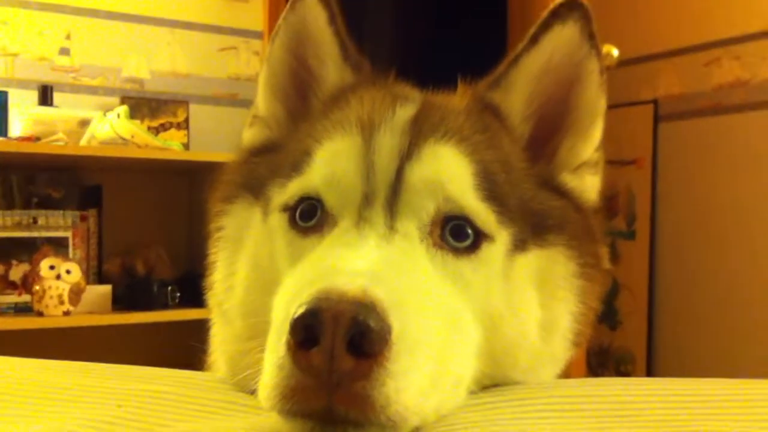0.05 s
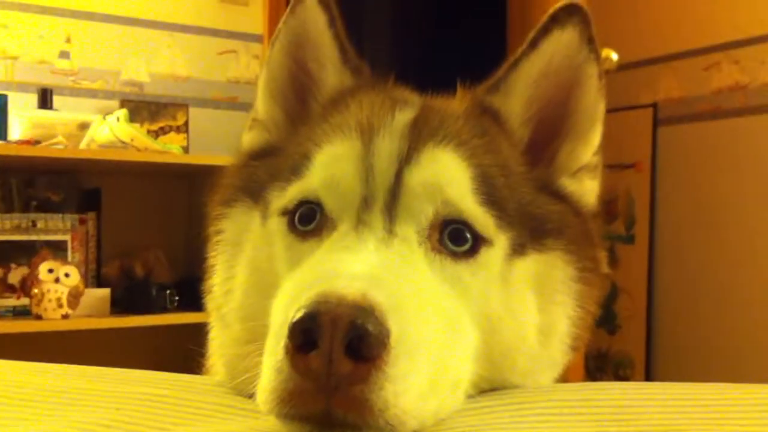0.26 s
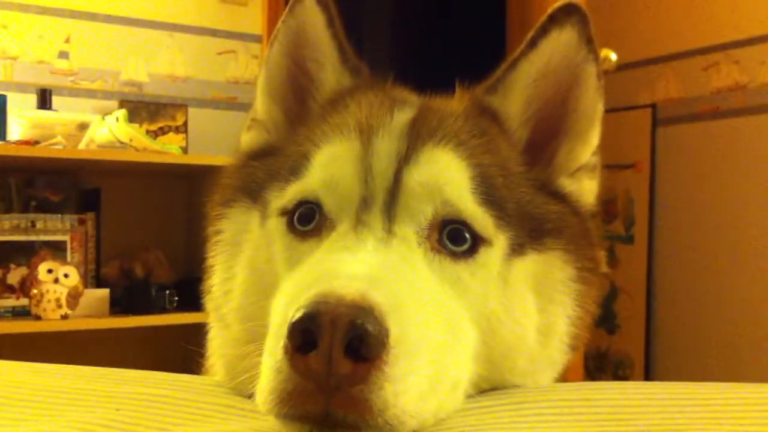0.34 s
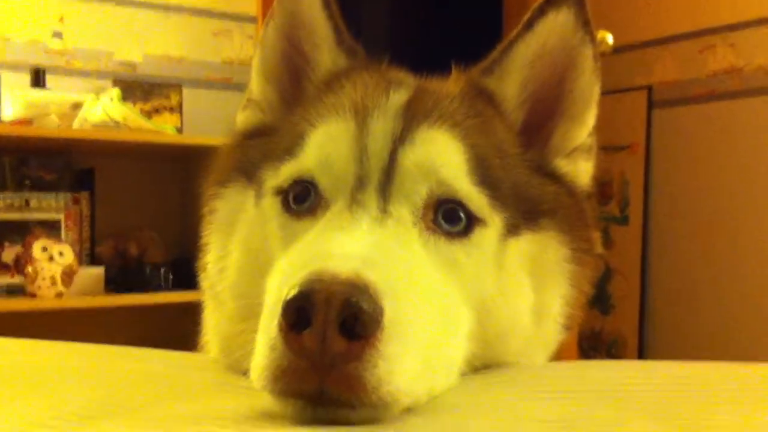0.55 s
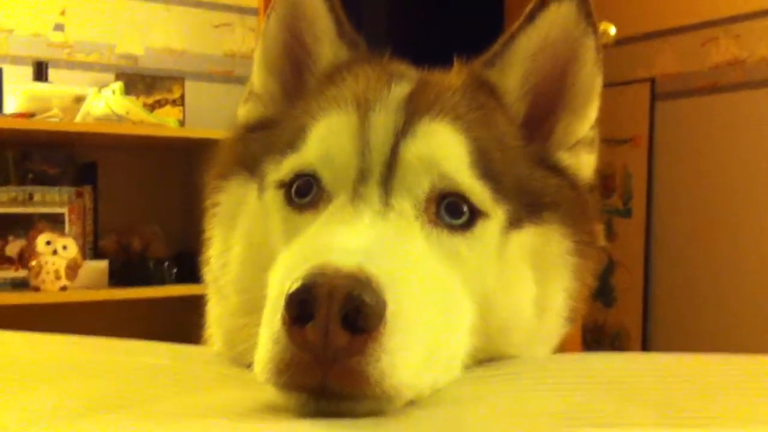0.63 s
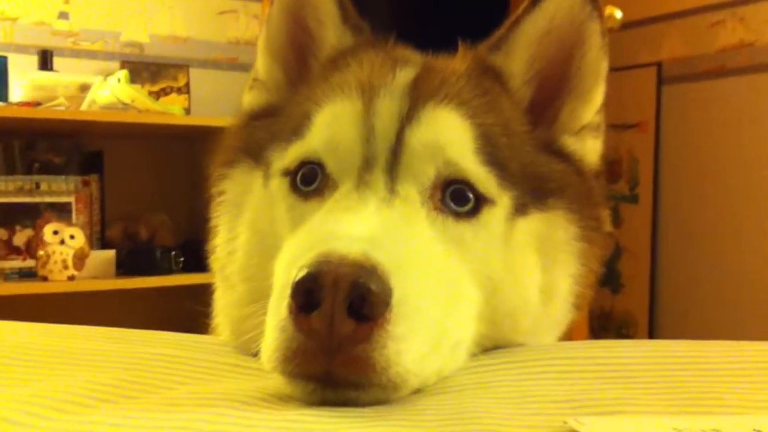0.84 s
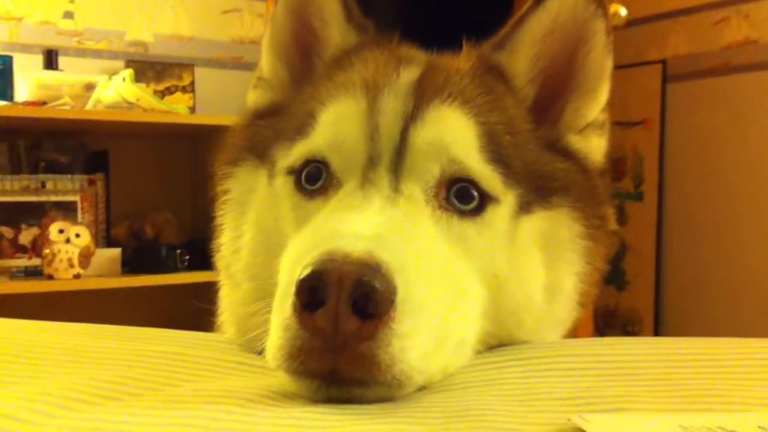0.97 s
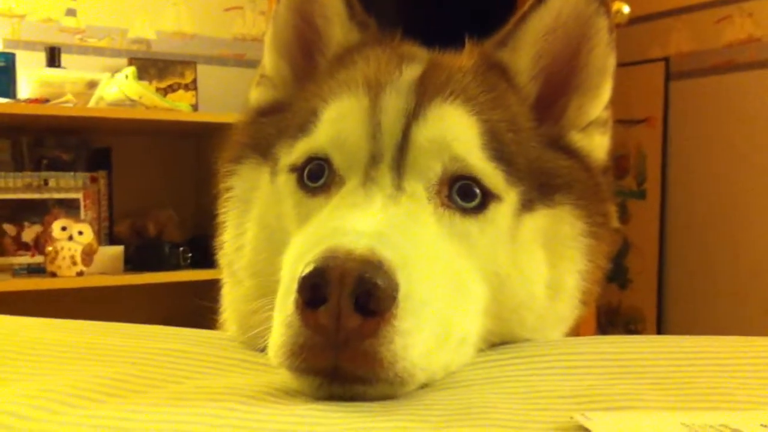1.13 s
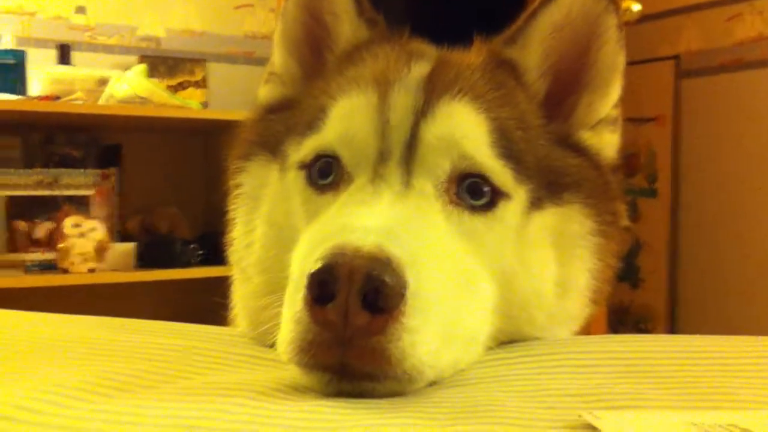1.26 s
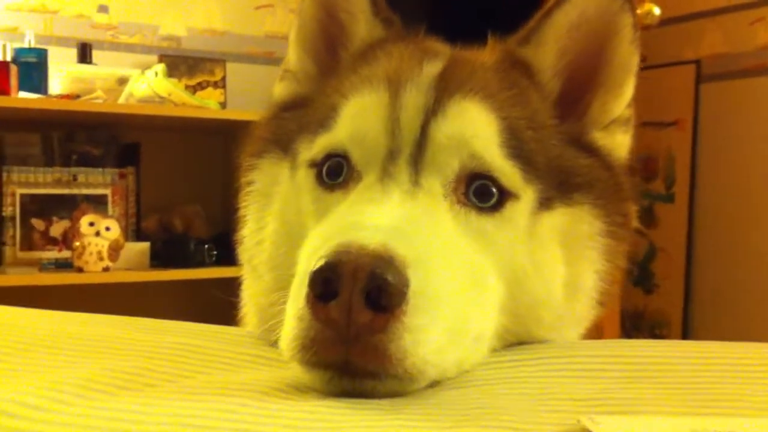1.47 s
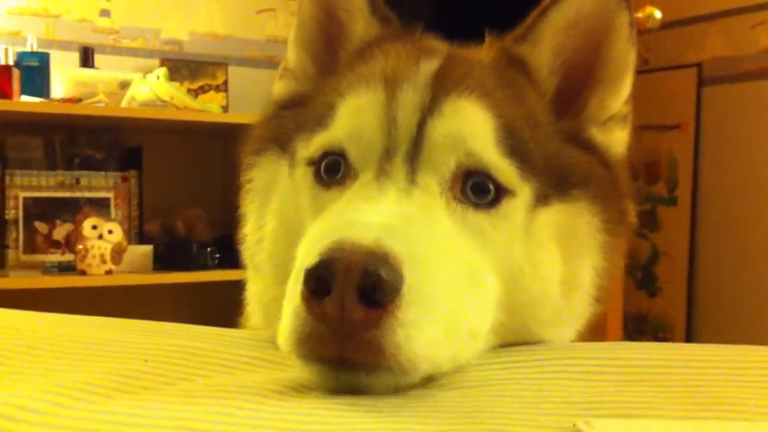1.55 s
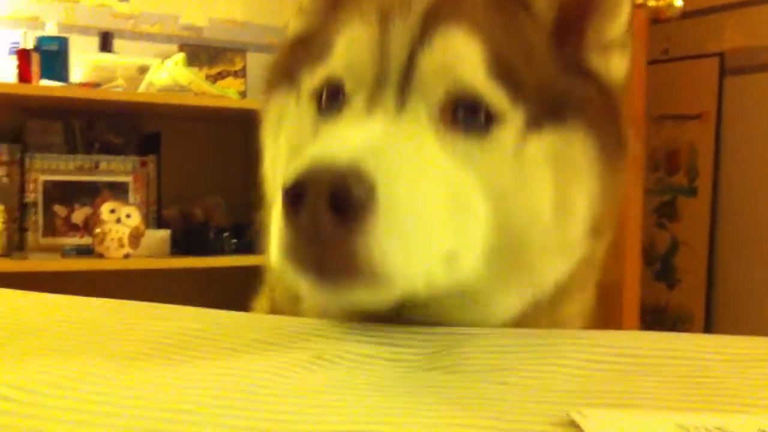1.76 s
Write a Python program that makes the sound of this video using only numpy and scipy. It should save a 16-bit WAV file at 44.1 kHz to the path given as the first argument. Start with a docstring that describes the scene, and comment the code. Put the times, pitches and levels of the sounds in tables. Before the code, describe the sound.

A dish clinks sharply at about 0.1 seconds, ringing briefly in a small quiet room. A much lighter tap on it follows at 0.5 seconds. From 1.2 seconds to about 1.8, a dog shifts its chin on bedding close by: fur rustles faintly and the cloth gives several dull ticks, with a very soft thud at 1.3 seconds. Faint room hiss lies underneath.

```python
"""Dish knocks and a dog on its bedding

A dish is knocked twice in a small quiet room: a sharp clink, then a light tap at another spot.
Each knock cracks, rings briefly in the dish and dies away in the room, with faint hums close by.
Then a dog shifts its chin on the bedding: fur rustles on cloth, folds give way with dull ticks
and the mattress thuds softly. Faint room noise and hiss lie under it all."""
import sys
import numpy as np
from scipy import signal
from scipy.fft import rfft, irfft
from scipy.io import wavfile
from scipy.ndimage import uniform_filter1d

SR = 44100
rng = np.random.default_rng(int(sys.argv[2]) if len(sys.argv) > 2 else 0)


def int16_out(signal):
    """Quantize to a 16-bit WAV file."""
    q = np.round(np.clip(np.atleast_2d(signal).T, -1, 1) * 32767)
    wavfile.write(sys.argv[1], SR, q.astype(np.int16))


N = 79380
TIME = np.arange(N) / SR


def from_db(db):
    """Turn decibels into a factor to multiply a sound by."""
    return 10 ** (np.asarray(db) / 20)


def at_hz(points, hz):
    """Read between the rows of a frequency table, giving each octave equal space."""
    freqs, values = np.transpose(points)
    return np.interp(np.log(np.maximum(hz, 1)), np.log(freqs), values)


def coloured(x, spectrum):
    """Filter x to the given spectrum with no ringing ahead of a hit; white noise keeps its power."""
    gain = from_db(at_hz(spectrum, np.fft.rfftfreq(N, 1 / SR)))
    gain /= np.sqrt(np.mean(gain ** 2))
    cepstrum = irfft(np.log(gain), N)
    fold = (1 + np.sign(np.arange(N))) * (np.arange(N) < N // 2)   # makes the filter minimum-phase
    return irfft(rfft(x) * np.exp(rfft(cepstrum * fold)), N)


def wobble(size):
    """A random drift with a spread of 1, smoothed over `size` samples."""
    drift = uniform_filter1d(rng.standard_normal(N), size=size)
    return drift / drift.std()


def decay(start, t60):
    """A sudden start, then a fade that loses 60 dB every t60 seconds."""
    return (TIME >= start) * from_db(-60 * np.maximum(TIME - start, 0) / t60)


def ring(start, hz, t60):
    """One fading tone of a struck object."""
    return decay(start, t60) * np.sin(2 * np.pi * hz * (TIME - start))


def swell(peak_s, width_s, hz, db):
    """A short, slightly unsteady tone that fades in and out."""
    pitch = hz * (1 + 0.019 * wobble(size=300))
    phase = 2 * np.pi * np.cumsum(pitch) / SR
    return from_db(db) * np.exp(-((TIME - peak_s) / width_s) ** 2) * np.sin(phase)


def background():
    """Faint, steady room noise and hiss."""
    # tone colour of the noise: f/Hz, level/dB per Hz
    spectrum = [(25, 8.5), (50, -28), (80, -5), (125, 9), (240, 4.5), (450, 3), (800, -0.5), (2000, -3),
                (5000, -5), (10000, -8), (16000, -9)]
    return from_db(-68) * coloured(rng.standard_normal(N), spectrum)


def fur_rustle():
    """Fur rubs on cloth with a grainy noise: a trace at first, more when the dog shifts its chin."""
    # loudness of the rubbing: t/s, level/dB
    rubbing = [(0, -65.5), (.08, -74.5), (.3, -72.5), (1.05, -81), (1.2, -67.5), (1.28, -63.5),
               (1.37, -63.5), (1.43, -62.5), (1.54, -62), (1.64, -65.5), (1.72, -63.5), (1.8, -63)]
    # tone colour of the cloth: f/Hz, level/dB per Hz
    cloth = [(50, -20.5), (130, -3), (250, 3), (550, -3), (1000, -9), (2000, -15.5), (5000, -21),
             (10000, -21), (16000, -25.5)]
    level_db = np.interp(TIME, *np.transpose(rubbing))
    grain_db = 1.5 * wobble(size=200)
    return from_db(level_db + grain_db) * coloured(rng.standard_normal(N), cloth)


def dish_knocks():
    """Each knock snaps, cracks and sets the dish ringing; where it lands sets the mix of tones."""
    # the knocks: t/s, ring level/dB, crack level/dB, crack fade time/s, place (0 = rim, 1 = foot)
    knocks = [(0.132, -29, -25, 0.073, 0.011), (0.4913, -47.5, -43, 0.038, 0.94)]
    # the dish's own tones: f/Hz, fade time/s, level struck at the rim/dB, level struck at the foot/dB
    tones = [(532.4, 0.062, -4, -22), (675, 0.055, -15, -0.5), (765, 0.048, -66, 2.5),
             (1016, 0.073, -12, -18), (1250, 0.042, -20, -6), (1328, 0.049, -6, 6.5),
             (1864, 0.037, -1, -12), (1958, .06, -4.5, -26), (2373, 0.08, -4.5, -4.5),
             (2606, 0.052, -1, -29), (2660, 0.043, 0, -2), (2995, 0.041, 8, -9.5), (3060, 0.14, -0.5, -22),
             (3073, .08, 0, -3), (3587, 0.22, -18.5, -10), (3820, 0.064, -11.5, -1.5),
             (4190, 0.046, 0, -0.5), (4323, .06, -2.5, -1.5), (5535, .05, -2, -10), (5686, .08, -6.5, -16),
             (6160, 0.045, -7, -2), (6330, 0.065, -9, -9), (7050, 0.047, -0.5, -31),
             (7444, 0.045, -2.5, -2), (7700, 0.037, -10, 2), (8280, 0.076, -5.5, -14.5),
             (9233, 0.042, 3, -28), (10440, 0.092, -14.5, -14), (11770, 0.047, -1, -5),
             (12480, .045, -2.5, -27), (13600, .045, -10, -23)]
    # the crowd of short-lived overtones in the crack: f/Hz, level/dB per Hz
    crack = [(30, -7), (80, -17.5), (200, -8), (320, -3.5), (600, -3.5), (840, -17), (1150, 3),
             (1600, -6.5), (2600, 1), (3100, 0), (3450, -9), (4250, 0.5), (4700, -6), (5600, 2),
             (9400, -0.5), (10000, -14.5), (10700, -1), (13500, -4.5), (16000, -12.5)]
    out = np.zeros(N)
    for start, ring_db, crack_db, crack_t60, place in knocks:
        snap = from_db(3.5) * decay(start, t60=0.0041)   # the first instant of contact
        contact = decay(start, crack_t60) + snap
        out += from_db(crack_db) * coloured(contact * rng.standard_normal(N), crack)
        for k, (hz, t60, rim_db, foot_db) in enumerate(tones):
            level_db = ring_db + (1 - place) * rim_db + place * foot_db
            out += (-1) ** k * from_db(level_db) * ring(start, hz, t60)   # every other tone is flipped
    return out


def room(x):
    """The room adds a few quick echoes, then a wash of sound whose bands fade at their own speeds."""
    # echoes from nearby surfaces: delay/s, level/dB
    reflections = [(.009, -12.5), (0.0117, -13.5), (0.032, -17.5)]
    # how long the room takes to fade by 60 dB: f/Hz, fade time/s
    fade_times = [(150, 0.5), (600, 0.39), (1300, 0.19), (2800, 0.38), (6000, .3), (14000, 0.23)]
    tail_db, build_up_s = -13, 0.0044
    edges_hz = np.geomspace(90, 18000, 13)
    tail = np.zeros(N)
    for low, high in zip(edges_hz, edges_hz[1:]):
        band_pass = signal.butter(2, [low, high], "band", fs=SR, output="sos")
        band = signal.sosfilt(band_pass, rng.standard_normal(N))
        tail += band * decay(0, at_hz(fade_times, np.sqrt(low * high)))
    tail *= 1 - np.exp(-TIME / build_up_s)
    echoes = sum(from_db(db) * np.pad(x, (int(delay * SR), 0))[:N] for delay, db in reflections)
    wash = signal.fftconvolve(x, tail / np.linalg.norm(tail))[:N]
    return x + echoes + from_db(tail_db) * wash


def faint_hums():
    """Brief, faint tones swell and fade around the knocks."""
    # the hums: peak t/s, width/s, f/Hz, level/dB
    hums = [(.225, 0.013, 622, -52), (.285, 0.028, 2640, -64), (0.478, 0.015, 660, -63.5)]
    return sum(swell(*hum) for hum in hums)


def cloth_ticks():
    """Folds of cloth give way, each with a dull tick made of a tone and a weaker overtone."""
    # the ticks: t/s, level/dB, f/Hz
    ticks = [(1.2574, -41.5, 453), (1.282, -46.5, 513), (1.3141, -43.5, 520), (1.402, -68, 396),
             (1.5203, -44.5, 590), (1.527, -46.5, 596), (1.709, -48, 573), (1.768, -50, 565)]
    fade_cycles, overtone_ratio, overtone_db = 4.7, 2.56, -8.5
    out = np.zeros(N)
    for start, db, hz in ticks:
        upper_hz = hz * overtone_ratio
        tone = ring(start, hz, fade_cycles / hz)
        overtone = from_db(overtone_db) * ring(start, upper_hz, fade_cycles / upper_hz)
        out += from_db(db) * (tone - overtone)
    return out


def mattress_thud():
    """The mattress gives under the dog's chin with one soft, low thud."""
    return swell(peak_s=1.3, width_s=0.025, hz=164.5, db=-58.5)


def scene():
    """The dish and its room echo, the hums, the bedding close by and the background, in one channel."""
    hums = faint_hums()
    dish = room(dish_knocks())
    bedding = fur_rustle() + cloth_ticks() + mattress_thud()
    return (dish + hums + bedding + background())[None]


def record(dry):
    """The small microphone loses the bass, and the highest treble is cut steeply."""
    low_cut_hz, high_cut_hz = 86.6, 15900
    thin = signal.sosfilt(signal.butter(2, low_cut_hz, "high", fs=SR, output="sos"), dry)
    return signal.sosfilt(signal.ellip(10, .2, 80, high_cut_hz, fs=SR, output="sos"), thin)


dry = scene()
out = record(dry)
int16_out(out)
```